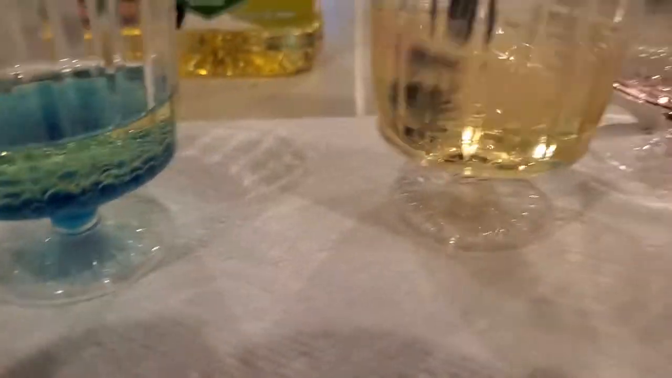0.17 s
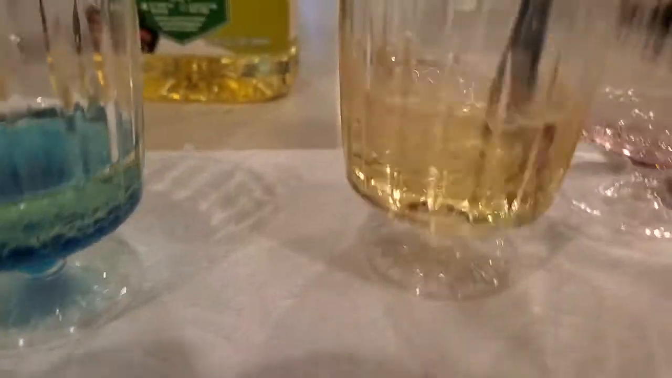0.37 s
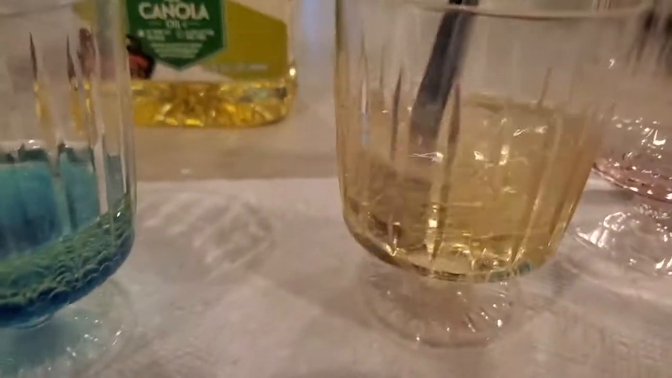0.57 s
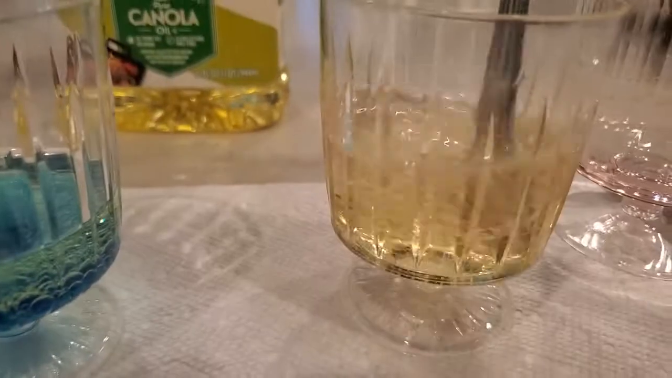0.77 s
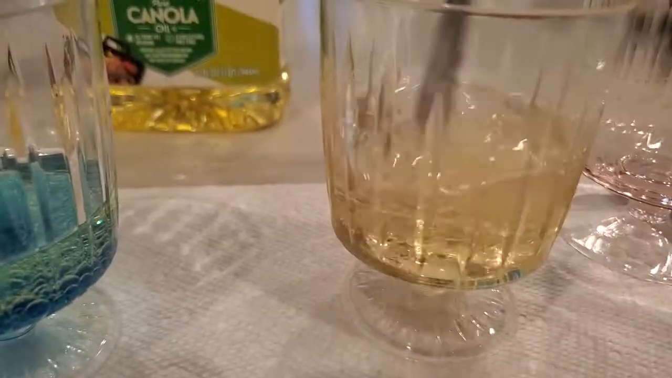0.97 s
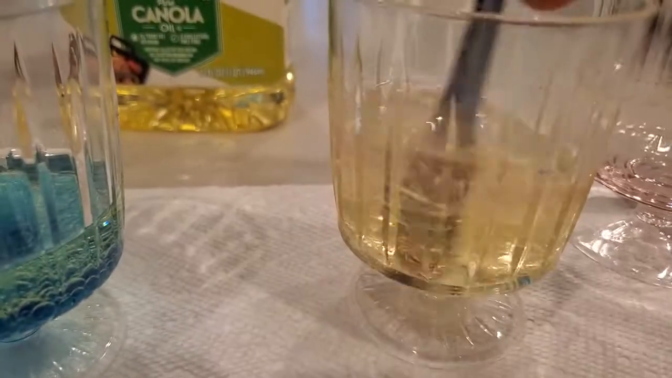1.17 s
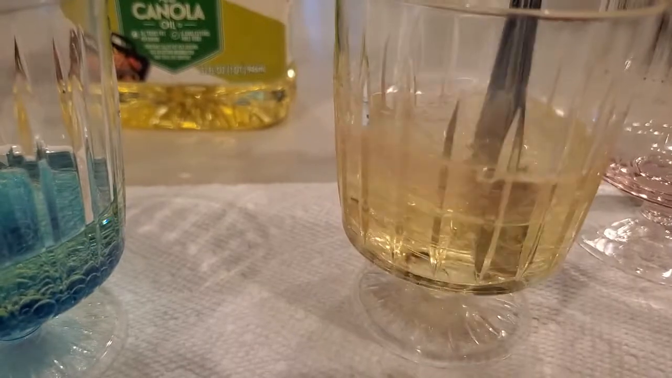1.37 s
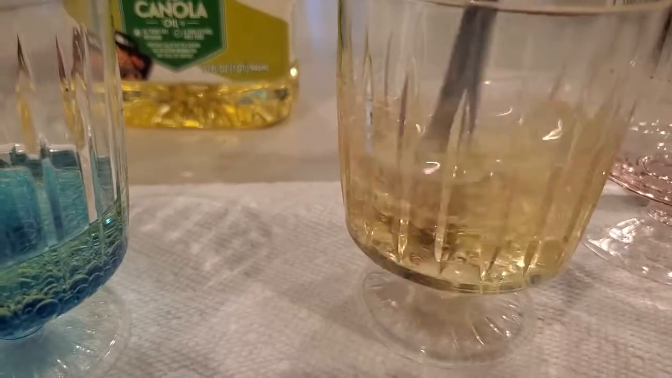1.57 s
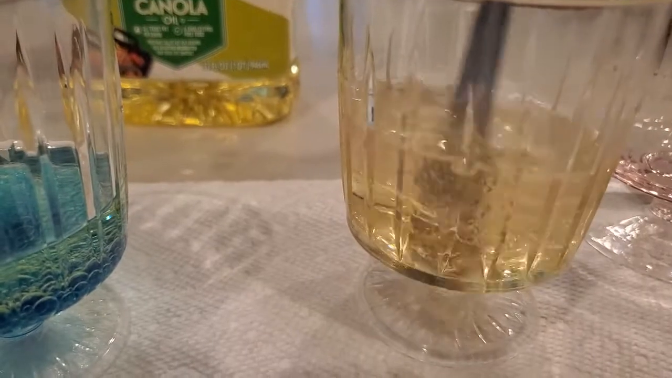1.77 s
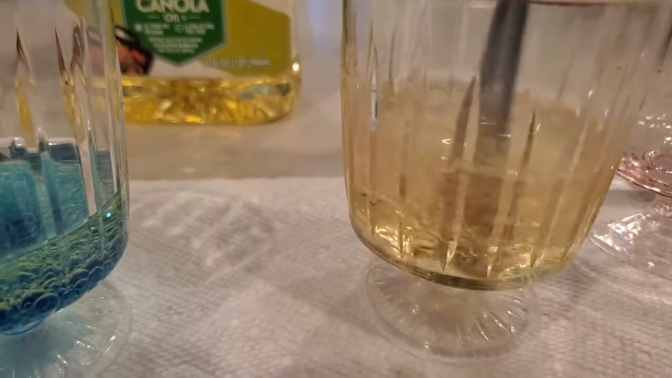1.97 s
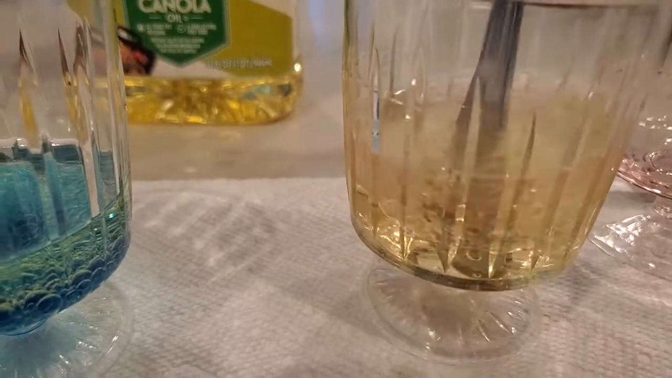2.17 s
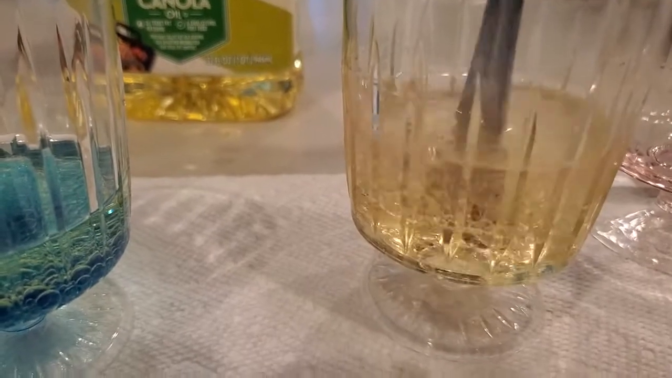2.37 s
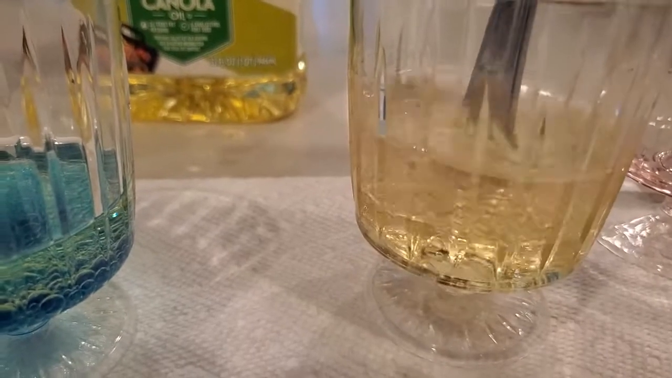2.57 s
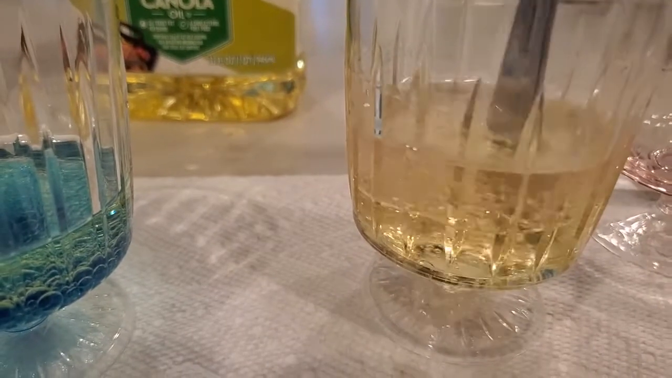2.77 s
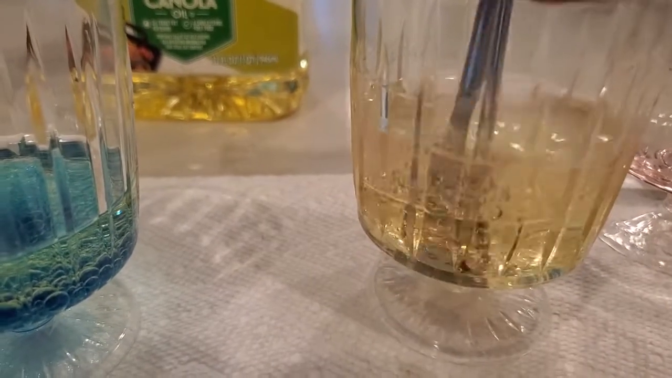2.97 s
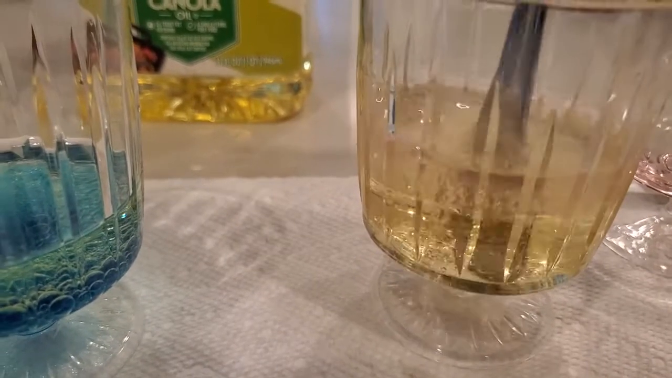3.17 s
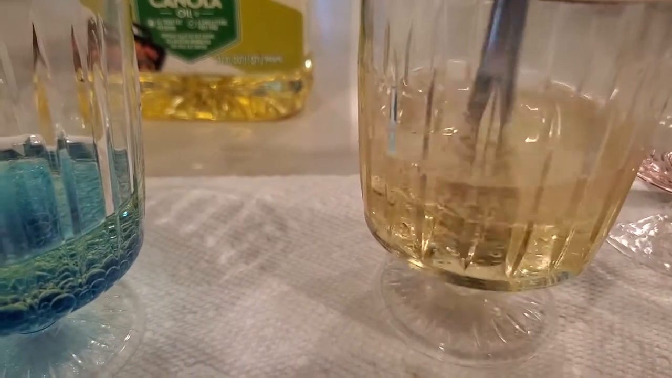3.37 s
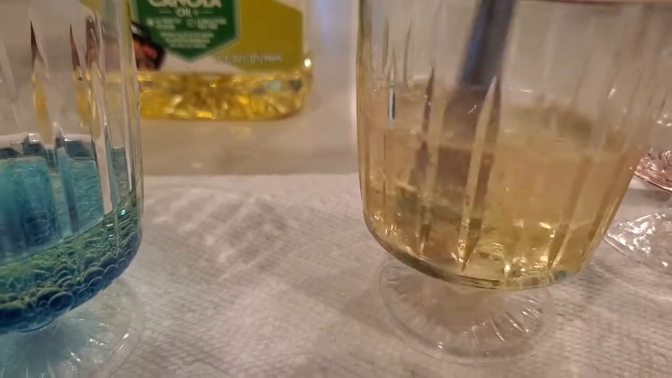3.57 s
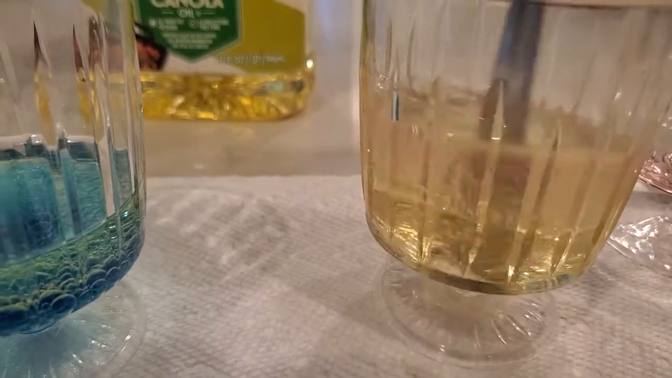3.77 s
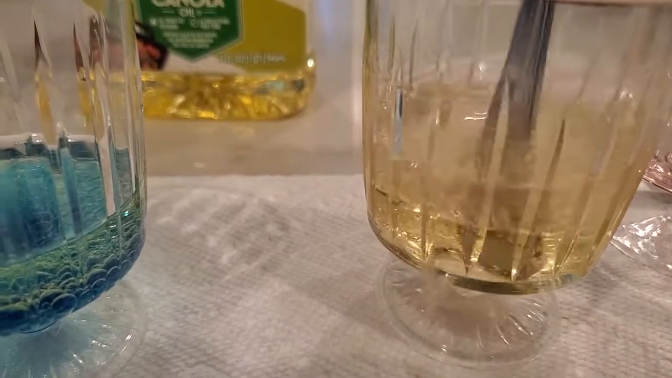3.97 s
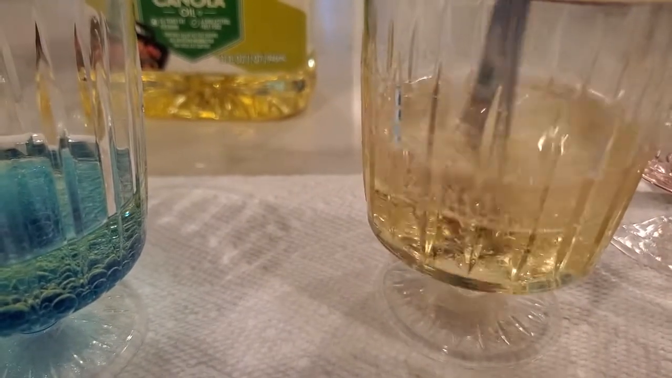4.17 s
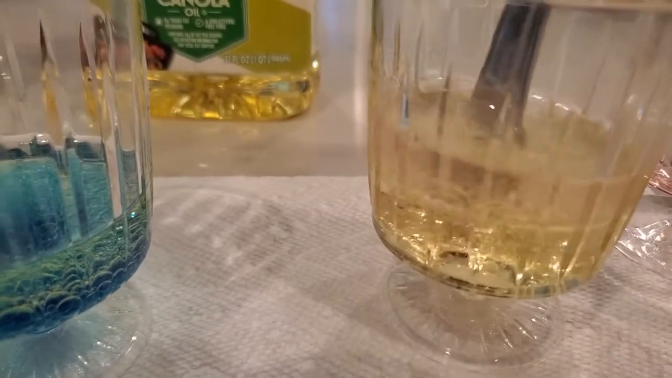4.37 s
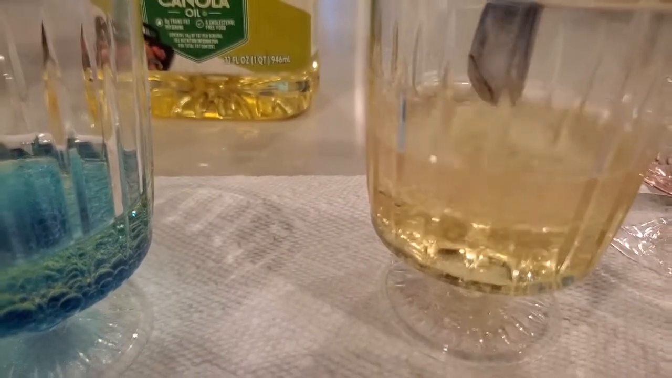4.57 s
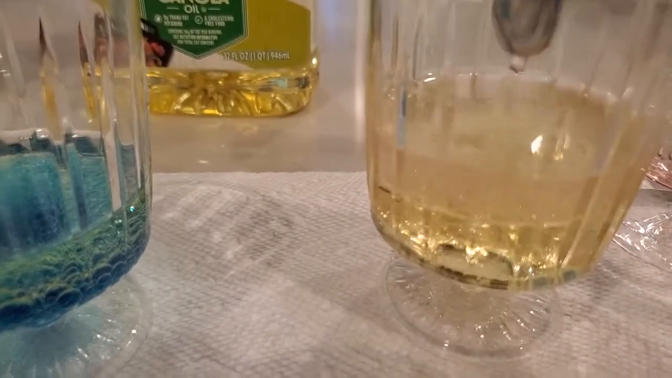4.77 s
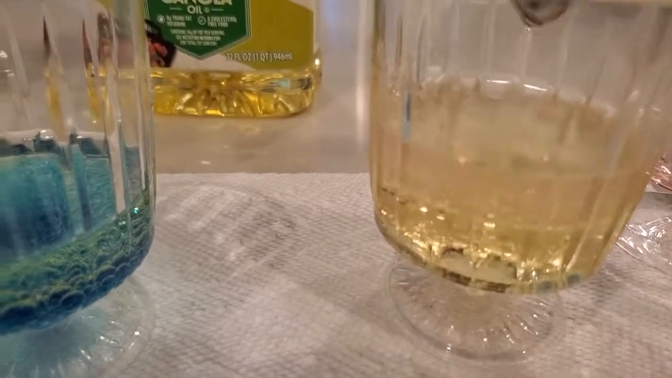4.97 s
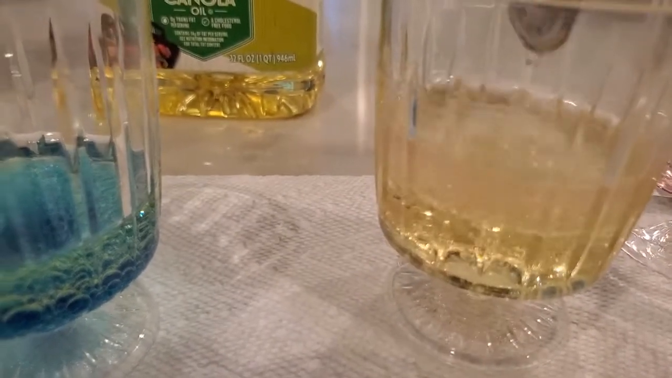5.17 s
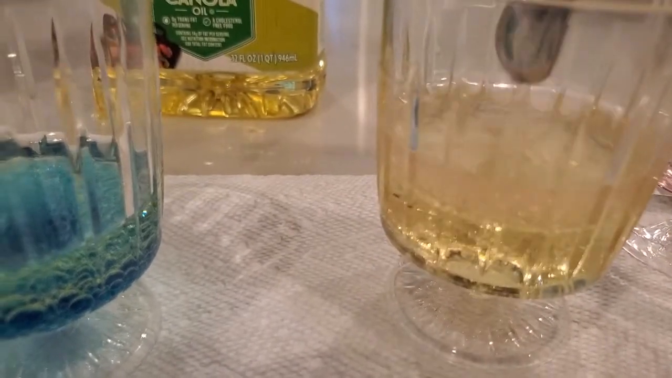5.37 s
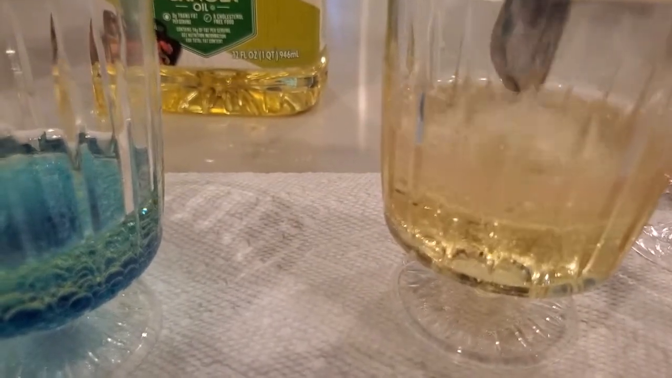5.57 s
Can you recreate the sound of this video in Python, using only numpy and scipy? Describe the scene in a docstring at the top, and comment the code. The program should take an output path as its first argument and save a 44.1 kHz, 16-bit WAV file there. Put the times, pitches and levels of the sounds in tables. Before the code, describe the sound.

Close stereo microphones catch a spoon knocking and scraping inside a partly filled glass. Each clink is short, dry and slightly crackly, its ring choked by the liquid, with a small room tail. Light scratchy rubbing links the irregular hits. After a short pause the knocks return stronger, then stop, and only low rumble, wavering hum, thin hiss and a few barely audible soft swells remain.

```python
"""A metal spoon stirs thick liquid in a footed glass, heard close up through a pair of microphone ports.
Knocks and slides set the glass's ringing modes going, and the liquid makes them die out fast.
Each contact adds a noisy crack and a treble splash; rubbing feeds noise to the same modes, plus a thin hiss.
The quiet room adds a short noise tail, over a low appliance rumble, hums, thin hiss and faint soft swells."""
import sys
import numpy as np
from scipy import signal
from scipy.io import wavfile
from scipy.ndimage import uniform_filter1d

SR = 44100
rng = np.random.default_rng(int(sys.argv[2]) if len(sys.argv) > 2 else 0)


def unload_wav(signal):
    """Save mono or channel-first audio to the path in sys.argv[1] as 16-bit WAV at rate SR, clipped to [-1, 1]."""
    wavfile.write(
        sys.argv[1],
        SR,
        np.round(np.clip(np.atleast_2d(signal).T, -1, 1) * 32767).astype(np.int16),
    )


N = 247216


def from_db(db):
    """Turn a level in dB into a gain."""
    return 10 ** (np.asarray(db) / 20)


def rms_one(x):
    """Scale a sound to an rms level of 1."""
    return x / np.sqrt(np.mean(x ** 2) + 1e-20)


def at_hz(points, hz):
    """Read a (pitch_hz, value) table on a log-pitch axis."""
    pitch_hz, value = np.array(points).T
    return np.interp(np.log(hz), np.log(pitch_hz + 1e-9), value)


def drift(rate_hz):
    """Slow random wander of spread 1: noise smoothed twice at one fortieth of the sample rate."""
    r = np.exp(-2 * np.pi * rate_hz * 40 / SR)
    noise = rng.standard_normal(N // 40 + 2002)
    slow = signal.lfilter([1], [1, -2 * r, r * r], noise)[2000:]   # skip the filter's start
    return np.interp(np.arange(N) / 40, np.arange(len(slow)), rms_one(slow))


def band_pass(x, low_hz, high_hz):
    """Keep only the pitches between two edges."""
    return signal.sosfilt(signal.butter(2, [low_hz, high_hz], "band", fs=SR, output="sos"), x)


# how alike the room noise is in the two ports: (pitch_hz, likeness; below 0 is used as 0)
LIKENESS = [(60, 0.95), (180, 0.95), (550, 0.71), (1650, -0.33), (4970, -0.44), (15000, -0.088)]
# which port hears more of the room noise: (pitch_hz, left_over_right_db)
BACKGROUND_BALANCE = [(60, -1), (240, -0.5), (950, 3), (3770, 3.5), (15000, 9.5)]


def ports(mid, side, hz):
    """Mix two noises so the ports are as alike and as balanced as the tables say at this pitch."""
    alike = np.clip(at_hz(LIKENESS, hz), 0, 1)
    pan_db = at_hz(BACKGROUND_BALANCE, hz) / 2
    both = np.sqrt(1 + alike) * mid + np.sqrt(1 - alike) * side * [[1], [-1]]
    return from_db([[pan_db], [-pan_db]]) * both


def noisy_bands(bands):
    """Send noise twice through a resonance for each (pitch_hz, width_hz, level_db)."""
    out = 0
    for hz, width_hz, level_db in bands:
        b, a = signal.iirpeak(hz, hz / width_hz, fs=SR)
        noise = ports(*rng.standard_normal((2, N)), hz)
        twice = signal.lfilter(b, a, signal.lfilter(b, a, noise))
        out = out + from_db(level_db) * rms_one(twice)
    return out


# tone colour of the rumble: (pitch_hz, relative_db_per_hz)
RUMBLE_COLOUR = [(28, -33), (45, -3), (110, -4.5), (150, -10), (200, -4), (330, -14.5), (445, -11.5),
                 (520, -20), (700, -20), (1030, -44), (1800, -40), (3000, -47), (10000, -59.5),
                 (15500, -50.5)]
RUMBLE_DB = -55


def rumble(patchy_db):
    """Low appliance rumble: third-octave bands of noise, each flickering a little in level."""
    out = 0
    edges_hz = 25 * 2 ** (np.arange(29) / 3)
    white = rng.standard_normal((2, 2, N))   # neighbouring bands use different noise
    for k, (low_hz, high_hz) in enumerate(zip(edges_hz, edges_hz[1:])):
        mid, side = band_pass(white[k % 2], low_hz, high_hz)
        hz = np.sqrt(low_hz * high_hz)
        gain = from_db(at_hz(RUMBLE_COLOUR, hz) + patchy_db * drift(3.1))
        out = out + gain * ports(mid, side, hz)
    return from_db(RUMBLE_DB) * rms_one(out)


# mains hum: (pitch_hz, width_hz, level_db)
MAINS = [(119.44, 3.8, -61)]
# thin hiss: (pitch_hz, width_hz, level_db)
HISS = [(6760, 900, -81.5), (8400, 1400, -86.5), (15100, 1500, -90.5)]


def mains_and_hiss():
    """Steady background: a narrow noise band for the mains hum, wider ones for the hiss."""
    return noisy_bands(MAINS + HISS)


# upper hum bands: (pitch_hz, width_hz, relative_db)
HUM = [(195, 49, -5.5), (263, 23, -8), (306.3, 37, -7.5)]
HUM_DB, WAVER_DB, WAVER_HZ = -58, 3.5, 3.6   # level added to every band; size and rate of the waver


def wavering_hum():
    """The upper hum bands waver together in level at random."""
    return from_db(HUM_DB + WAVER_DB * drift(WAVER_HZ)) * noisy_bands(HUM)


# faint soft swells of midrange noise in the room: (top_s, low_band_db, high_band_db, rise_db_per_s)
SWELLS = [(4.666, -70.5, -70, 260.5), (5.18, -72, -83, 695), (5.522, -73, -69, 141)]
# the two noise bands of a swell: (pitch_hz, width_hz, relative_db)
SWELL_BANDS = [(1395, 230, 0.0017), (1800, 590, 0.0038)]
SWELL_FALL_DB_PER_S = 108


def swells():
    """Each swell climbs to its top and fades more slowly, in two noise bands."""
    rows = np.array(SWELLS)
    late_s = np.arange(N) / SR - rows[:, :1]
    shape_db = np.where(late_s < 0, rows[:, -1:] * late_s, -SWELL_FALL_DB_PER_S * late_s)
    out = 0
    for k, band in enumerate(SWELL_BANDS):
        gain = from_db(rows[:, k + 1, None] + shape_db).sum(axis=0)
        out = out + gain * noisy_bands([band])
    return out


def background():
    """Everything but the glass, with its lowest and highest pitches cut."""
    far = rumble(patchy_db=2.5) + mains_and_hiss() + wavering_hum() + swells()
    far = signal.sosfilt(signal.butter(4, 37.2, "high", fs=SR, output="sos"), far)
    return signal.sosfilt(signal.cheby2(12, 40, 15900, fs=SR, output="sos"), far)


# how long the room tail takes to fade by 60 dB: (pitch_hz, fade_s)
ROOM_FADE = [(500, 0.31), (1500, 0.34), (4000, 0.39), (9000, 0.085), (15000, 0.67)]
ROOM_DB = -14


def room(x, onset_s):
    """Spread-out tail: octave bands of noise fading at their own rates, unrelated in the two ports."""
    t = np.arange(SR // 2) / SR
    tail = 0
    for low_hz in 250 * 2. ** np.arange(6):
        noise = band_pass(rng.standard_normal((2, len(t))), low_hz, 2 * low_hz)
        tail = tail + noise * from_db(-60 * t / at_hz(ROOM_FADE, low_hz * np.sqrt(2)))
    tail *= 1 - np.exp(-(t / onset_s) ** 2)   # the first walls take a moment to answer
    tail /= np.sqrt(np.sum(tail ** 2) / 2)
    return from_db(ROOM_DB) * signal.fftconvolve(x, tail, axes=1)[:, :N]


# spoon rubbing the wall, one list per spell: (time_s, mode_feed_db, hiss_db), both before later gains
RUB = [
    [(0.0, -77.5, -102), (0.33, -98, -82), (0.46, -76, -79.5), (0.74, -87, -87), (1.02, -85, -84),
     (1.15, -83, -86), (1.47, -82.5, -89), (1.62, -110, -98), (1.85, -79, -93), (2.03, -79.5, -82),
     (2.27, -83, -89), (2.35, -97, -97)],
    [(2.8, -95, -89.5), (2.874, -94.5, -88.5), (2.996, -69, -82), (3.226, -79, -90), (3.382, -74, -80),
     (3.69, -86.5, -92.5), (3.838, -83, -90.5), (3.908, -84, -87), (4.034, -79.5, -87), (4.168, -91, -87),
     (4.27, -86, -87.5), (4.4, -94.5, -95)],
]


def rub_strength(column):
    """Gain of the rubbing in time, practically silent outside its spells."""
    t = np.arange(N) / SR
    out = 0
    for rows in map(np.array, RUB):
        out = out + from_db(np.interp(t, rows[:, 0], rows[:, column], left=-200, right=-200))
    return out


# colour of the rubbing hiss: (pitch_hz, width_hz, relative_db)
RUB_HISS = [(6654, 1800, 4.5), (11500, 7000, -2)]


def rub_hiss():
    """Thin treble noise that follows the rubbing."""
    return rub_strength(column=2) * noisy_bands(RUB_HISS)


# spoon knocks: (start_s, ring_db, crack_over_ring_db before a later cut,
#                place 0 side wall, 1 lower wall, 2 bottom, brightness_db_per_octave)
KNOCKS = [(0.07, -54.5, 11, 2.4, 0), (0.261, -43, 4, 1.87, 0.5), (0.508, -52.5, -5, 0.63, -7),
          (0.94, -46.5, 16, 1, -1.5), (1.202, -35.5, 20, 0.35, 1), (1.265, -34.5, 18.5, 0.66, 3.5),
          (1.288, -39.5, 20.5, 0.44, -1), (1.554, -38.5, 8, 0, 0.5), (1.634, -55, 21, 0.21, -1.5),
          (1.808, -30.5, 19.5, 0.059, 0), (2.068, -45, 0, 0, -1.5), (2.153, -42, 19, 0.41, -0.5),
          (2.822, -35.5, 17, 1.25, -1), (2.849, -53, 6.5, 1.2, -2), (2.93, -20.5, 19.5, 0.17, 0),
          (3.034, -56.5, 3, 1.92, -4), (3.117, -39.5, 19, 0.1, 0.5), (3.279, -28, 16.5, 0, 0),
          (3.453, -53, 8, 1, -3.5), (3.578, -65.5, 9, 0.66, -4.5), (3.623, -49.5, 7, .4, 1),
          (3.799, -43.5, 7, 1, -1.5), (3.845, -25, 22.5, 0.17, -0.5), (3.98, -42.5, 26.5, 0.37, 0.5),
          (4.132, -34, 19.5, 0.12, 0.5)]
# short slides of the spoon: (start_s, ring_db, favoured_pitch_hz, rise_s)
SLIDES = [(0.27, -46, 1950, 0.013), (0.591, -57, 3840, 0.0089), (0.757, -59.5, 5340, 0.0057),
          (0.948, -40, 2090, 0.0049), (1.008, -54.5, 2300, 0.0051), (1.078, -56.5, 5100, 0.0078),
          (1.14, -60, 1500, .013), (1.454, -55, 1250, 0.0062), (2.83, -39, 1800, 0.003),
          (3.186, -51, 3230, .012), (3.645, -42, 2180, 0.011)]
KNOCK_RISE_S = .0007   # time for a knock's force to reach its peak
KNOCK_RING, SLIDE_RING = .92, 0.9   # share of each mode's fade time


def contacts():
    """Sample index, force and ring share of each contact: the force rises quickly to 1, then falls."""
    start_s = np.array([[row[0]] for row in KNOCKS + SLIDES])
    rise_s = np.r_[[KNOCK_RISE_S] * len(KNOCKS), np.array(SLIDES)[:, -1]]
    lag = np.arange(4400)
    age = lag / SR / np.clip(rise_s, 2e-4, .02)[:, None]
    force = age * np.exp(1 - age)
    index = np.round(start_s * SR).astype(int) + lag
    sliding = np.arange(len(start_s))[:, None] >= len(KNOCKS)
    return index, force, np.where(sliding, SLIDE_RING, KNOCK_RING)


# middle pitch of each group of modes: (pitch_hz)
GROUP_HZ = [500, 950, 1700, 2950, 4200, 6500]
# one row per struck place 0, 1, 2; one column per group of modes: (level_db)
PLACES = [(-16.5, 1, -12.5, -7.5, -5, -7.5), (-6.5, -4, 1, -3, -4.5, -12.5), (8, -10, -9.5, 2, -2.5, -9.5)]
SLIDE_DB_PER_OCT, SLIDE_CRACK_DB = 18.5, -4.5   # fall-off from favoured pitch; crack over ring before a cut


def colours():
    """Group and crack levels: knocks follow place and brightness, slides favour one pitch."""
    _, ring_db, crack_db, place, bright_db = np.transpose(KNOCKS)
    octaves = np.log2(np.array(GROUP_HZ) / GROUP_HZ[2])
    struck_db = np.transpose([np.interp(place, range(len(PLACES)), group) for group in np.transpose(PLACES)])
    knocks_db = ring_db[:, None] + struck_db + bright_db[:, None] * octaves
    _, slide_db, favoured_hz, _ = np.transpose(SLIDES)
    away_octaves = abs(np.log2(GROUP_HZ / favoured_hz[:, None]))
    slides_db = slide_db[:, None] - SLIDE_DB_PER_OCT * away_octaves
    return np.vstack([knocks_db, slides_db]), np.r_[ring_db + crack_db, slide_db + SLIDE_CRACK_DB]


def bursts(index, force, level_db, fade_s, pan_db, spread, low_hz, top_hz):
    """Broad noise that follows the force of each contact and dies away."""
    out = np.zeros((2, N))
    mid, side = rng.standard_normal((2, *force.shape))
    fade = from_db(-60 / (fade_s * SR))
    swing = signal.lfilter([1 - fade], [1, -fade], force)
    for k, sign in enumerate((1, -1)):
        gain = from_db(level_db[:, None] + sign * pan_db / 2)
        np.add.at(out[k], index, gain * swing * (mid + spread * sign * side))
    return band_pass(out, low_hz, top_hz)


def crack(index, force, crack_db):
    """The noisy crack of each contact."""
    return bursts(index, force, crack_db - 14, fade_s=0.031, pan_db=5.5, spread=0.81, low_hz=600, top_hz=9300)


KNOCK_SPLASH_DB, SLIDE_SPLASH_DB = 2.5, -5   # splash over the top group of modes


def splash(index, force, top_group_db):
    """The top modes are so dense that they blur into a splash of treble noise."""
    extra_db = np.r_[[KNOCK_SPLASH_DB] * len(KNOCKS), [SLIDE_SPLASH_DB] * len(SLIDES)]
    return bursts(index, force, top_group_db + extra_db,
                  fade_s=0.025, pan_db=4.0, spread=0.98, low_hz=7500, top_hz=15200)


# modes of the filled glass: (pitch_hz, level_db, fade_s for 60 dB before contact damping,
#                            left_over_right_db, left_lead_rad)
GLASS = [(515, 7, 0.015, -5.5, 1.85), (674, 5, 0.033, 3, 2), (881, 3.5, 0.023, 1.5, -0.1),
         (930, -1, 0.049, 2.5, -1.25), (1030, 3.5, 0.023, 4.5, 1.47), (1375, 9.5, 0.023, -0.5, 1.97),
         (1517, 5, 0.031, 8.5, -0.2), (1716, 7.5, 0.048, 2, 1.8), (1966, 0.5, 0.017, 12, -0.8),
         (2201, -2.5, 0.039, 11, 1.46), (2473, -3.5, 0.056, -5.5, 1.1), (2766, -2.5, 0.069, -1.5, .8),
         (3100, -9.5, 0.11, 5, 0.04), (3805, -11.5, 0.09, -8.5, -5.2), (4366, 2, 0.017, 3, 0.2),
         (4070, 5, .03, -1.5, 1.38), (4260, 1.5, 0.075, -9.5, 1.87), (4276, 3.5, 0.063, -5, 2.1),
         (5420, -3.5, 0.04, -3, 3.4), (5680, 4, 0.024, -6.5, 0.66), (5840, -8, .03, 7.5, -4),
         (6084, 3.5, .025, 9, -2.3), (6600, 5, 0.022, 8, -5.5), (6670, 5.5, 0.026, 8.5, -5),
         (7020, -4, 0.032, 3, -1), (7465, -8, 0.018, -1.5, -1), (7630, -2, 0.03, 8.5, -5),
         (8210, -15.5, 0.013, 13.5, 8)]
# middle modes before the layers of liquid have mixed: (mode_hz, pitch_shift_percent, level_change_db)
UNMIXED = [(1034, -0.5, 0), (1500, 2, -7), (1754, 6.5, 4.5), (1943, 2, -6), (2133, 2.5, 6.5),
           (2430, 2, -13), (2730, -0.5, -10), (3160, 2.1, 7), (3800, -2, 6), (4130, -2.5, 5),
           (4220, -6.5, -2), (4330, -1, 2.5), (5500, 0.5, 0)]
MIXED_S = 1.15   # contacts starting before this use the unmixed modes
SCATTER_DB, DETUNE = 2.2, .004   # random spread per contact and mode: level, share of pitch
SKID, SLOSH = .07, .055   # random phase steps in radians per sample
RUB_FEED_DB, RUB_DAMPING = -29.0, 2.1   # level added to the rub; how many times faster modes fade under it
RUB_LOW_DB, RUB_SPLIT_HZ = 2, 2600   # rub boost for modes below the split


def glass(groups_db, ring_share, index, force):
    """Each contact drives every mode at its own strength and tuning; rubbing feeds them more damped."""
    force = force / force.sum(axis=1, keepdims=True)
    scatter, tuning = rng.standard_normal((2, len(index), len(GLASS), 1))
    unevenness = from_db(3.4 * drift(30) + RUB_FEED_DB)
    grit = rng.standard_normal(N) * unevenness * rub_strength(column=1)
    out = np.zeros((2, N))
    age_s = np.arange(index.shape[1]) / SR
    early = index[:, :1] < MIXED_S * SR
    near_hz, shift_percent, shift_db = np.transpose(UNMIXED)
    for k, (hz, level_db, fade_s, pan_db, lead_rad) in enumerate(GLASS):
        # rubbing: grit through one ringing mode
        pole = from_db(-60 * RUB_DAMPING / (fade_s * SR)) * np.exp(2j * np.pi * hz / SR)
        feed = from_db(RUB_LOW_DB * (hz < RUB_SPLIT_HZ))
        ring = signal.lfilter([feed], [1, -pole], grit + 1e-18)

        # a long contact loses step with the mode
        start_rad = rng.uniform(0, 2 * np.pi, (len(index), 1))
        slip = start_rad + SKID * np.cumsum(rng.standard_normal(force.shape), axis=1)
        # moving liquid blurs the pitch while it rings
        blur = SLOSH * np.cumsum(rng.standard_normal(force.shape), axis=1)
        fade = from_db(-60 * age_s / (fade_s * ring_share))
        swing = fade * np.cumsum(force * np.exp(1j * slip) / fade, axis=1)

        group_db = np.array([[np.interp(np.log(hz), np.log(GROUP_HZ), row)] for row in groups_db])
        group_db = group_db + early * np.interp(hz, near_hz, shift_db)
        unmixed_shift = early * np.interp(hz, near_hz, shift_percent) / 100
        tuned_hz = hz * (1 + DETUNE * tuning[:, k] + unmixed_shift)
        swing *= from_db(group_db + SCATTER_DB * scatter[:, k])
        swing *= np.exp(2j * np.pi * tuned_hz * age_s + 1j * blur)
        for at, one in zip(index, swing):
            ring[at[0]:at[-1] + 1] += one

        # each mode radiates its own way toward the two ports
        for port, sign in enumerate((1, -1)):
            gain = from_db(level_db + sign * pan_db / 2)
            out[port] += gain * (ring * np.exp(1j * sign * lead_rad / 2)).imag
    return out


def scene():
    """Spoon and glass, their room tail and the background."""
    index, force, ring_share = contacts()
    groups_db, crack_db = colours()
    near = glass(groups_db, ring_share, index, force)
    near = near + crack(index, force, crack_db)
    near = near + splash(index, force, groups_db[:, -1])
    near = near + rub_hiss()
    return near + room(near, onset_s=.005) + background()


def record(dry):
    """Cut the very top steeply."""
    return signal.sosfilt(signal.cheby2(14, 70, 16800, fs=SR, output="sos"), dry)


dry = scene()
out = record(dry)
unload_wav(out)
```